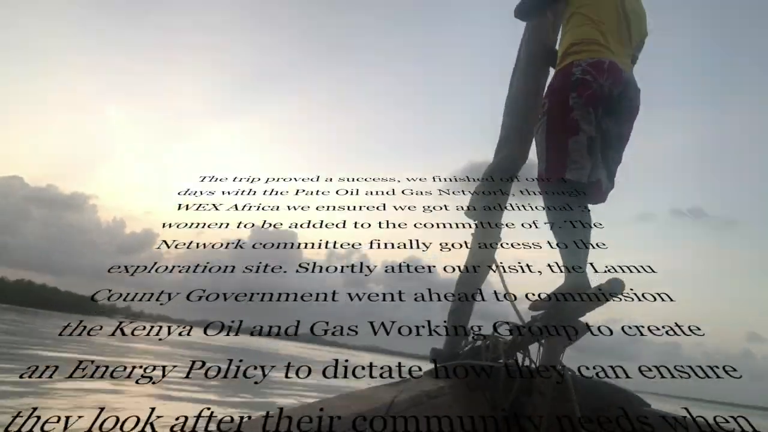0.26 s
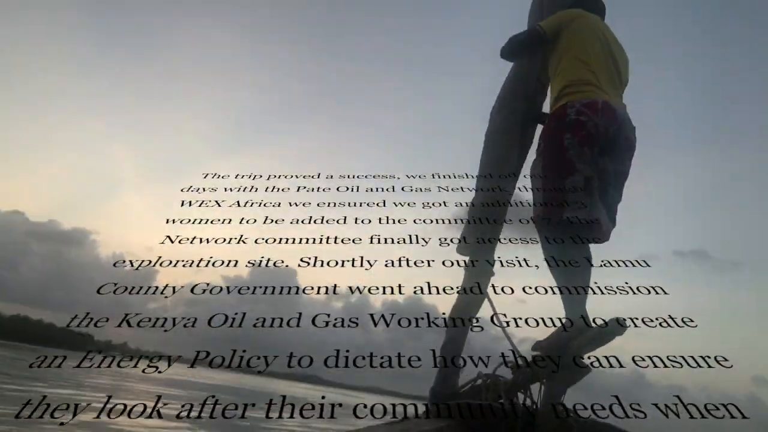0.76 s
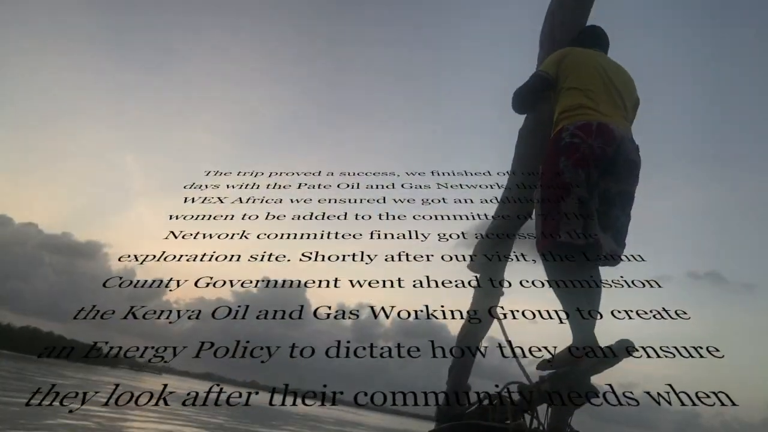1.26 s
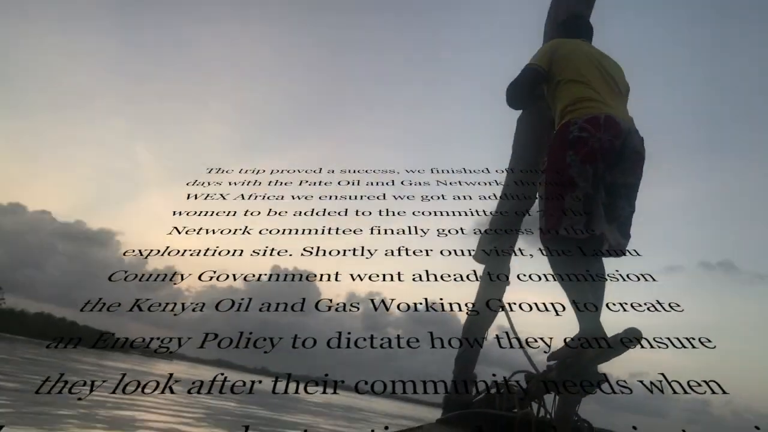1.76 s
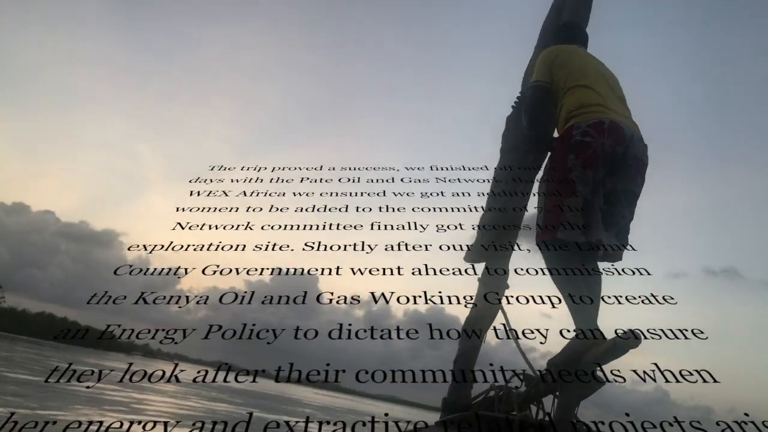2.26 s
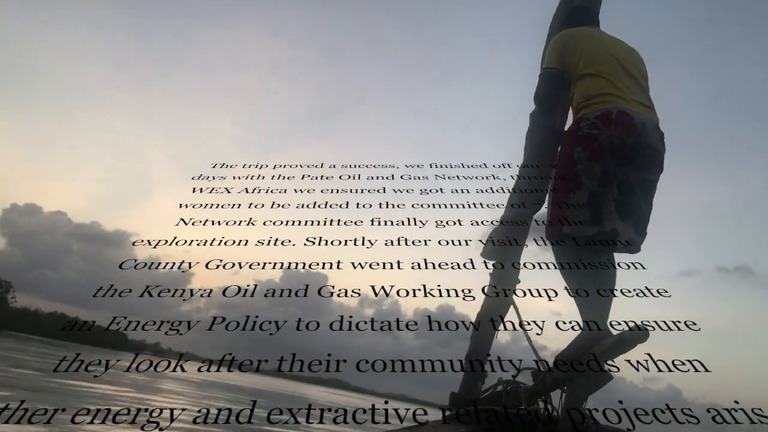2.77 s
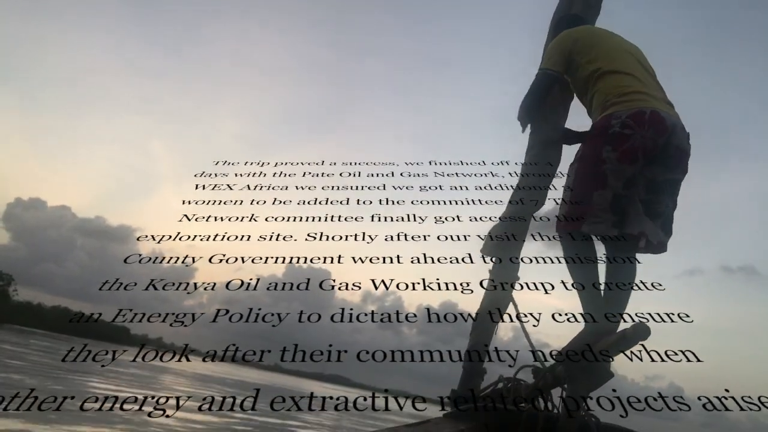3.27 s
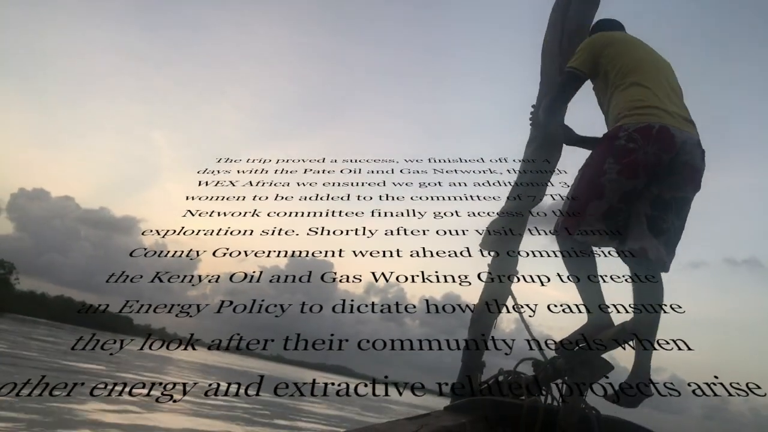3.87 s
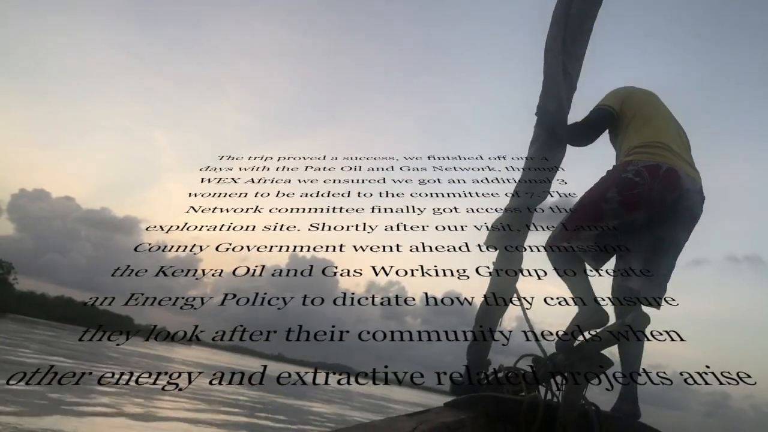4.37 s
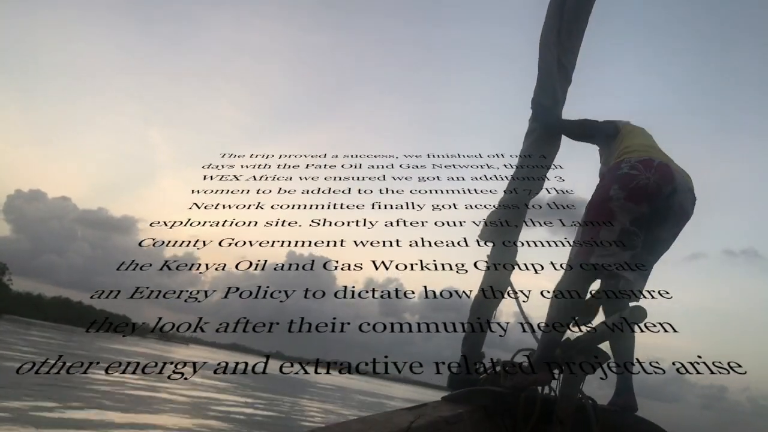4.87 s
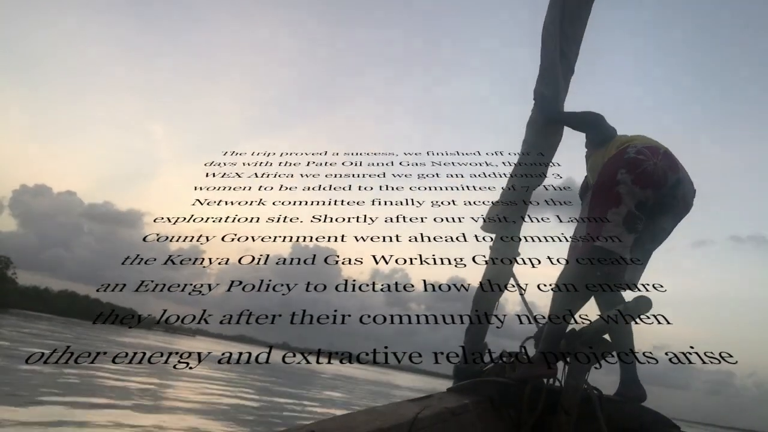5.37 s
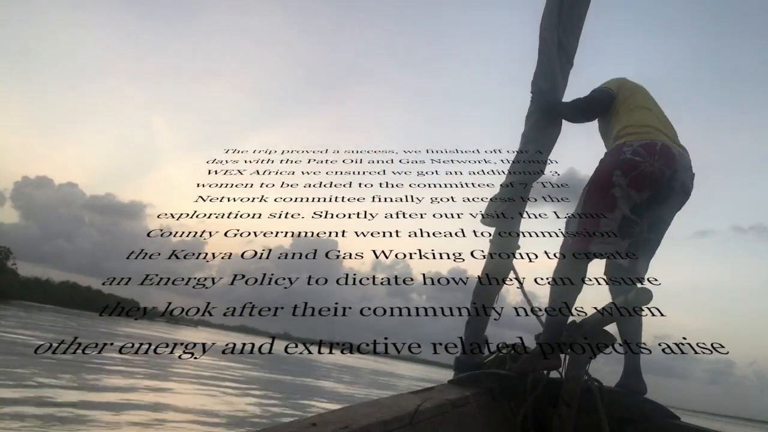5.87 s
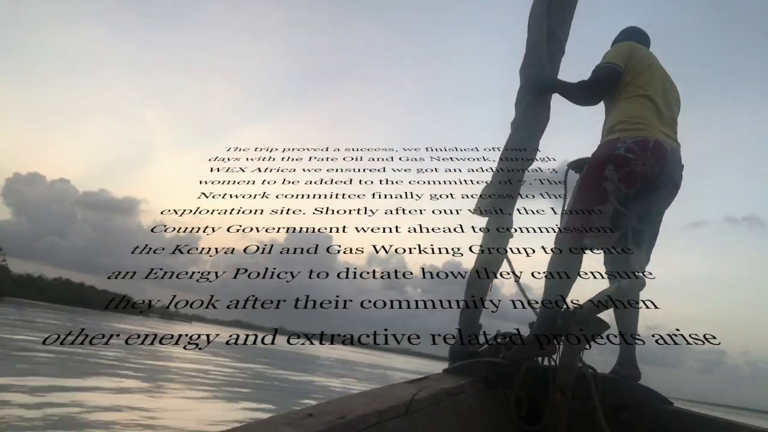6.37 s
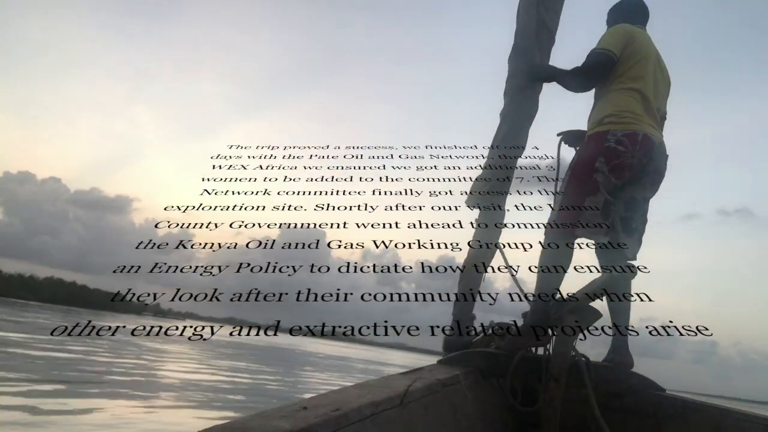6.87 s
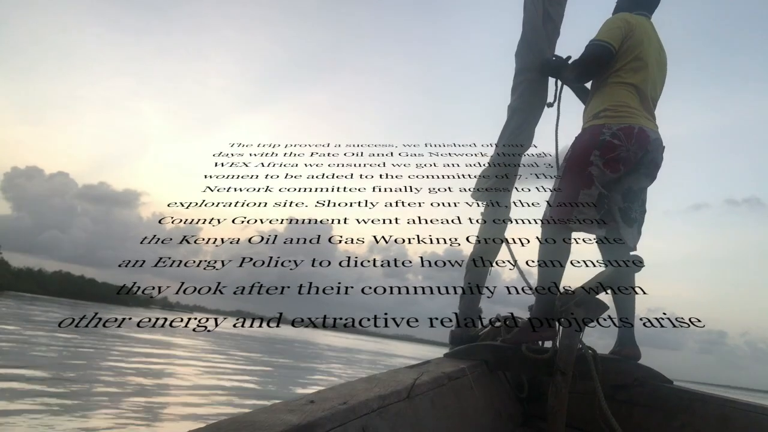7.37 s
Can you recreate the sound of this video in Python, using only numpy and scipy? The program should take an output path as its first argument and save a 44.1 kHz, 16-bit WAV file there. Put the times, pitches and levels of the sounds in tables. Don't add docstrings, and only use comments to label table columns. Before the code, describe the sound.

Outdoors on a small wooden sailing boat, a hand-held microphone picks up low wind rumble, quiet water and steady faint hiss. The first two seconds are busy with scratchy cloth and rope rubs and muffled knocks. Then come footfall-like raps with scuffs and very sharp dry clicks, leading to a deep hull thump just after four seconds. The rest is calm, with tiny creaks and sparse taps, then a short rattle of knocks near the end.

```python
import sys
import numpy as np
from scipy import signal
from scipy.fft import rfft, irfft, next_fast_len
from scipy.io import wavfile
from scipy.ndimage import uniform_filter1d

SR = 44100
rng = np.random.default_rng(int(sys.argv[2]) if len(sys.argv) > 2 else 0)


def materialize(psi):
    bounded = np.clip(np.atleast_2d(psi).T, -1, 1)
    quanta = np.round(bounded * 32767).astype(np.int16)
    wavfile.write(sys.argv[1], SR, quanta)


def magnitude_from_level(level_db):
    exponent = np.asarray(level_db, float) / 20
    return 10 ** exponent


N = 335995

# [f/Hz, level/dB]
RUMBLE_COLOUR = [(12, -50), (20, -7.5), (64, -3), (110, -9.5), (129, -8), (183, -12.5), (252, -18),
                 (320, -23), (357, -21), (381, -30.5), (900, -22), (1170, -67), (1980, -120)]
# [f/Hz, level/dB]
WATER_COLOUR = [(180, -40), (300, -8), (355, -3), (386, -4.5), (607, -12), (682, -14), (793, -16.5),
                (923, -16), (1250, -16), (4770, -26), (15200, -32.5), (16500, -57)]
# [f/Hz, level/dB]
FIBRE_COLOUR = [(530, -38), (900, -11), (1260, 0.5), (1400, -3), (2050, 3), (3070, -4.5), (3670, 3),
                (4330, -1.5), (5310, -0.5), (7230, 2), (15500, -4)]
# [f/Hz, level/dB]
MIC_COLOUR = [(20, -1), (6500, -0.5), (7600, -2.5), (8500, 0.5), (9600, 0.5), (10400, -3), (11500, 2.5)]
# [t/s, level/dB]
GUSTS = [(0, -39), (.15, -43.5), (.85, -44), (.98, -49.5), (1.29, -42), (1.46, -44), (1.74, -48.5),
         (1.82, -45.5), (2.82, -40), (3.12, -46.5), (3.42, -46), (3.75, -39), (3.84, -48.5), (4.11, -38),
         (4.6, -46.5), (6.6, -44), (6.97, -48.5), (7.3, -43.5)]
# [t/s, level/dB]
BUSTLE = [(0, -49), (.1, -58), (.4, -50.5), (.85, -53.5), (1.04, -55.5), (1.4, -50.5), (1.84, -55.5),
          (2.23, -59.5), (2.46, -57), (2.58, -57.5), (3.4, -61.5), (3.48, -51), (3.75, -62.5), (4.3, -57.5),
          (4.9, -64.5), (6.6, -61.5), (7.0, -62.5), (7.62, -65)]
# [t/s, peak level/dB, treble level/dB, fade by 60 dB/s]
RUBS = [(.072, -42, -3.5, 0.13), (.14, -45.5, -13, 0.61), (0.34, -38.5, -19, .12), (.375, -44.5, -9, .17),
        (0.45, -29, -8, .18), (.5629, -38, -13, 0.044), (.627, -42, -1.5, 0.083), (.7243, -54, -2, .12),
        (.92, -56, 4, .12), (1.034, -47.5, -4, 0.1), (1.069, -36, -26, 0.17), (1.094, -40, -6, 0.22),
        (1.12, -27.5, -10.5, 0.32), (1.2094, -55, -18, .12), (1.279, -39, -17, .12),
        (1.348, -42.5, -8, 0.16), (1.433, -42, -13, 0.14), (1.628, -42.5, -4.5, 0.12),
        (1.783, -47, -11, 0.2), (1.9, -42, -8, .064)]
# [t/s, peak level/dB, treble level/dB]
SCUFFS = [(2.104, -35, -24), (2.495, -41, -23), (2.592, -41.5, -29), (2.793, -36.5, -18),
          (2.8458, -31.5, -19), (3.461, -36, -13), (3.523, -37.5, -26), (3.926, -50.5, -5.5),
          (4.106, -34, -27), (4.174, -41.5, -8), (4.229, -46, -28), (4.4794, -47, -11), (7.319, -41, -14),
          (7.352, -51, -15), (7.567, -47, -1.5), (7.577, -45, -14), (7.586, -50, 2)]
# [t/s, level/dB, f/Hz, length/s, glide as end over start pitch]
CREAKS = [(0.933, -73, 3650, 0.11, 1.01), (4.412, -67, 1250, 0.041, 1.08), (4.385, -72, 2600, 0.049, .96),
          (4.452, -71, 2050, 0.03, 1.01), (4.475, -72, 2300, .025, 1.01), (5.006, -63.5, 1290, 0.013, 0.99),
          (6.683, -74, 2900, 0.018, 1.01), (6.76, -68.5, 1030, 0.017, 1.01), (.24, -64, 1300, .018, 1.45),
          (.272, -67, 1400, .08, .9), (.27, -73, 2250, .06, .9)]
# [t/s, peak level/dB, f/Hz, fade by 60 dB/s]
BOOMS = [(.003, -32.5, 172, 0.28), (.572, -39, 195, .12), (0.797, -33, 39.9, 0.3),
         (1.089, -37.5, 162, 0.19), (1.296, -27, 178.3, 0.28), (1.44, -30.5, 37, .25),
         (2.121, -38, 117, 0.096), (2.505, -24, 175.4, 0.26), (2.809, -34.5, 152, 0.1),
         (3.925, -30.5, 100.3, 0.3), (4.121, -16.5, 50.3, 0.13), (4.12, -28.5, 119.3, 0.21),
         (4.227, -28.5, 48, 0.15), (7.345, -50, 161, 0.16), (1.34, -37, 145, .2), (3.532, -39.5, 139, 0.18),
         (3.721, -39, 59.7, 0.11), (4.661, -33, 69, 0.097)]
# [t/s, peak level/dB, plank f/Hz, bright part level/dB]
THUDS = [(.004, -42, 506, -10.5), (0.196, -42, 402, -28), (.213, -46, 417, -18), (0.558, -35, 420, -40),
         (0.578, -56, 383, -26), (.695, -37.5, 275, -18), (.716, -42, 500, -28), (0.869, -32.5, 600, -24),
         (.884, -41, 370, -30), (1.091, -39, 408, -25), (2.305, -44.5, 580, -22),
         (2.772, -39.5, 256, -10.5), (3.923, -37.5, 272, -18), (4.108, -26.5, 302, -16),
         (4.122, -28, 400, -22), (4.256, -40, 660, -14), (5.413, -47.5, 448, -22), (6.171, -44, 370, -19),
         (7.337, -36.5, 500, -18), (7.393, -45.5, 360, -29), (.193, -46, 740, -26), (.213, -52, 690, -26)]
# [t/s, peak level/dB, plank f/Hz, bright part level/dB, bright f/Hz]
RAPS = [(1.13, -35, 420, -14, 1150), (1.209, -40.5, 477, -10.5, 1460), (1.257, -42, 800, 1.5, 1496),
        (1.287, -39, 600, -2, 1000), (1.293, -35, 420, -6.5, 1900), (1.639, -48.5, 630, 7, 1640),
        (2.102, -39, 412, 2.5, 1217), (2.493, -34, 476, -5.5, 1194), (2.596, -50.5, 423, -5, 1210),
        (2.798, -40.5, 315, -3.5, 1385), (2.829, -45.5, 415, -4.5, 938), (3.454, -54, 400, 9, 1450),
        (3.505, -46.5, 398, 2.1, 1390), (3.529, -45, 368, 0, 1290), (3.609, -54, 248, -4, 1790),
        (3.67, -46.5, 266, -7.5, 960), (3.739, -50.5, 290, -4, 985), (3.912, -38, 610, -5.5, 1150),
        (4.01, -45.5, 243, -8.5, 974), (4.174, -41, 378, -9, 1470), (4.223, -43, 245, -10, 1170),
        (7.3215, -37, 702, 2, 1250)]
# [t/s, peak level/dB, f/Hz, width/Hz]
PINGS = [(.9047, -43, 11500, 2500), (.9049, -46, 14500, 2000), (.9128, -33, 12000, 1800),
         (.913, -35, 14000, 1800), (.9132, -43, 9300, 1200), (2.8495, -35, 15200, 2200),
         (2.8497, -40, 9200, 1200), (2.8502, -37, 3800, 500), (7.5686, -44, 14000, 900),
         (7.5688, -45, 7000, 500), (7.5684, -39, 3800, 700), (.4553, -36, 3900, 600),
         (.6282, -42, 3750, 600), (.7765, -38, 1300, 500), (.8122, -36, 1650, 700),
         (2.3291, -33, 8600, 800), (2.3254, -33, 9000, 900), (3.4272, -36, 13500, 1500),
         (2.6628, -30, 3600, 500), (.7795, -36, 5800, 900), (6.5591, -47, 3500, 500),
         (.868, -48, 1250, 200), (7.3205, -33, 950, 160), (7.374, -50, 1200, 200), (1.2675, -40, 1400, 250),
         (1.273, -44, 1950, 300)]
# [t/s, peak level/dB, f/Hz]
CHATTER = [(6.5588, -43, 2880), (6.5636, -48, 2450), (6.5676, -51, 2600), (6.5771, -52, 3300),
           (4.4448, -50, 3700), (2.2364, -50.5, 2800), (1.6297, -39.5, 1870), (7.5685, -48, 2120),
           (7.356, -52, 4900), (7.323, -53, 4500), (4.0868, -27.5, 2180), (2.675, -43, 2700),
           (2.689, -48, 4000), (2.3205, -46, 2300), (2.3822, -36, 2450), (2.3853, -46, 5600),
           (.203, -52, 3700), (.344, -52, 2700), (.413, -47, 1750), (3.4578, -40, 3050),
           (3.4633, -46, 4500), (3.4635, -41, 2100), (3.513, -45, 3300), (3.5255, -43.5, 4000),
           (3.532, -45, 3440), (3.535, -40, 1330), (3.6419, -48, 2100), (3.6683, -48, 1600),
           (4.094, -45, 2900), (4.1093, -42.5, 3700), (4.118, -41, 2500), (4.16, -49, 4250),
           (4.1786, -45, 1800), (4.1841, -47, 3600), (4.222, -48, 1880), (4.2315, -50.5, 4000),
           (4.243, -52, 3600), (3.9285, -52, 2600)]
# [t/s, peak level/dB, middle modes level/dB, top modes level/dB, struck f/Hz]
SNAPS = [(0.4553, -34, -10, -20, 3750), (.757, -40.5, -12, -4, 2000), (0.776, -24.5, 4, -10.5, 3830),
         (0.7785, -35, -20, -20, 1880), (.812, -23, -12, -4.5, 2850), (2.3252, -22, -5, -3.5, 2560),
         (2.329, -22.5, -6, -8, 2580), (2.3327, -38, -3, -5, 3370), (2.346, -30.5, 0, -21, 2750),
         (2.3813, -21.5, -17, -23, 2440), (2.6592, -10.5, -29, -37, 2330), (2.8497, -39, -17, -18, 3030),
         (3.4271, -13.5, -5.5, -27, 2690), (3.4322, -25, -17, -18, 2750), (3.436, -26, -7.5, -17, 2870),
         (4.0866, -31.5, -1, -13, 2160), (7.5684, -40, -7, -14, 3830), (4.84, -61, 8, 4, 2060)]
# [t/s, peak level/dB, top modes
# level/dB, struck f/Hz]
MORE_TICKS = [
    (.0742, -43, -8, 2010),
    (0.6284, -36, -14, 3850),
    (1.0194, -59, -3, 3680),
    (1.413, -40, -15, 3630),
    (1.642, -42, -20, 1650),
    (6.0094, -55, -2, 2010),
]
# [f/Hz, width/Hz, level/dB]
SHELL_MODES = [(1750, 300, -9.5), (2250, 274, -3), (3454, 300, -0.5), (4280, 300, -2.5), (5200, 580, 2.5),
               (6235, 470, -2), (8020, 600, -3), (9300, 1000, -6), (11800, 1200, 3.5), (14000, 2000, 0.4)]


def noise(n=N):
    return rng.standard_normal(n)


def level(x, db):
    return x * magnitude_from_level(db) / np.sqrt(np.mean(x ** 2))


def colour(x, points):
    hz, db = np.transpose(points)
    n = next_fast_len(len(x))
    f = np.arange(n // 2 + 1) * SR / n + 1
    gain = magnitude_from_level(np.interp(np.log(f), np.log(hz), db))
    return irfft(rfft(x, n) * gain, n)[:len(x)]


def band(x, lo_hz, hi_hz, order=2):
    return signal.sosfilt(signal.butter(order, [lo_hz, hi_hz], "band", fs=SR, output="sos"), x)


def walk(rate):
    k = int(SR / rate)
    held = np.repeat(noise(N // k + 1), k)
    return 1.14 * uniform_filter1d(uniform_filter1d(held, k), k)[:N]


def grit(n, scatter_db, size=64):
    grains = magnitude_from_level(scatter_db * noise(n // size + 1))
    return noise(n) * np.repeat(grains, size)[:n]


def seconds(n):
    return np.arange(n) / SR


def mode_width(t60):
    return np.log(1000) / np.pi / t60


def ring(modes, t, turn, lag=0, wave=np.sin):
    hz, width, db = np.transpose(modes)[:, :, None]
    hz = hz * (1 + 0.013 * turn[:len(modes), None])
    swings = wave(2 * np.pi * hz * (t - lag))
    return np.sum(magnitude_from_level(db) * np.exp(-np.pi * width * t) * swings, axis=0)


def burst(t, t60, hold, rise):
    fade = np.exp(-np.log(1000) * np.maximum(t - abs(hold), 0) / max(t60, .005))
    return (1 - np.exp(-t / rise)) * fade


def add(out, s, sound, peak_db):
    i = max(int(s * SR), 0)
    out[i:i + len(sound)] += (sound * magnitude_from_level(peak_db) / np.abs(sound).max())[:N - i]


def hiss():
    return level(band(colour(noise(), WATER_COLOUR), 1130, 20000), -64.5)


def breeze(deep_db, drone_db, lap_db):
    low, mid, hum = (colour(noise(), RUMBLE_COLOUR) for _ in range(3))
    gust_top_db, drone_top_db = -37, -43
    deep = level(band(low, 27.4, 92.4), 0)
    deep = deep * magnitude_from_level(np.minimum(deep_db, gust_top_db) + 0.33 * walk(13.0))
    drone = level(band(mid, 109.3, 355), 0)
    drone = drone * magnitude_from_level(np.minimum(drone_db, drone_top_db) - 1.5 + walk(13))
    lap = level(band(colour(grit(N, 2.3), WATER_COLOUR), 358, 2080), 0)
    lap = lap * magnitude_from_level(lap_db + 1.4 * walk(20))
    stay_hz, stay_width_hz = 355.7, 15
    stay = band(hum, stay_hz - stay_width_hz / 2, stay_hz + stay_width_hz / 2, order=1)
    stay = level(stay, -67.5) * magnitude_from_level(3.5 * walk(2.62))
    return deep + drone + lap + stay


def rubs():
    cloth = [(*r, 0.041 * r[3]) for r in RUBS]
    feet = [(*r, 0.09, 0.0018) for r in SCUFFS]
    return cloth + feet


def rigging(rustle_db):
    low = level(band(colour(grit(N, 2.2), FIBRE_COLOUR), 800, 4620), 0)
    high = level(band(colour(grit(N, 2.0), FIBRE_COLOUR), 4800, 21600), 0)
    t, low_gain, high_gain = seconds(SR // 3), np.zeros(N), np.zeros(N)
    lag_s = .0025
    for s, db, treble_db, t60, hold in rubs():
        add(low_gain, s + lag_s, burst(t, t60, hold, 0.00016), db - 13.0)
        add(high_gain, s + lag_s, burst(t, 0.94 * t60, hold, 0.00022), db + treble_db - 5)
    swish_s, swish_length_s, swish_db = 6.9, 0.28, -68
    add(high_gain, swish_s, np.hanning(int(swish_length_s * SR)), swish_db)
    steady = magnitude_from_level(rustle_db - 8 + 2.1 * walk(40))
    return low * np.hypot(low_gain, steady) + high * np.hypot(high_gain, steady * magnitude_from_level(-3.5))


def creaks():
    out = np.zeros(N)
    for s, db, hz, length, glide in CREAKS:
        n = int(length * SR)
        wobble = uniform_filter1d(noise(SR // 2), size=90)[:n]
        pitch = hz * np.linspace(1, glide, n) * (1 + 0.43 * wobble)
        tone = np.sin(2 * np.pi * np.cumsum(pitch) / SR)
        add(out, s, np.hanning(n) ** .5 * tone, db + 11.0)
    return out


def hull():
    out, t = np.zeros(N), seconds(SR // 2)
    for s, db, hz, t60 in BOOMS:
        width = mode_width(max(t60, .02))
        boom = ring([(hz, width, 0), (0.565 * hz, width, -6)], t, np.zeros(2))
        add(out, s, boom * (1 - np.exp(-t * hz / 0.48)), db)
    return out


def knocks():
    thud_bright_hz, thud_cycles, thud_longest_s = 1350, 35, 0.086
    contact_t60_s, rap_cycles = 0.059, 24.6
    thuds = [(*r, thud_bright_hz, min(thud_cycles / r[2], thud_longest_s)) for r in THUDS]
    raps = [(*r, contact_t60_s + rap_cycles / r[2]) for r in RAPS]
    return thuds + raps


def shaken():
    out, t = np.zeros(N), seconds(SR)
    shake_t60_s = 0.52
    for s, db, *_ in knocks():
        add(out, s, burst(t, shake_t60_s / 2, .01, 0.0085), 2 * db)
    return out


def planks():
    out, t = np.zeros(N), seconds(SR // 5)
    for s, db, hz, bright_db, bright_hz, t60 in knocks():
        turn = noise(4)
        width = mode_width(max(t60, .01))
        shake = grit(len(t), 2.3)
        body = ring([(hz, width, 0), (1.7 * hz, 0.94 * width, -13), (0.741 * hz, width, -8)], t, turn)
        scrape = level(band(shake, 271, 502), 0) * burst(t, 2.15 * t60, 0.004, 0.005)
        body = body + 0.36 * scrape
        add(out, s, body * (1 - np.exp(-t / 0.00054)), db)
        edge = ring([(bright_hz, 2 * width, 0), (1.1 * bright_hz, 2.3 * width, -7),
                     (0.69 * bright_hz, 2 * width, -9)], t, turn)
        scrape = level(band(shake, 660, min(1.54 * bright_hz, 2100), order=5), 0)
        edge = edge + 0.5 * scrape * burst(t, 0.88 * t60, 0.007, 0.00056)
        add(out, s, edge * (1 - np.exp(-t / 0.00047)), db + bright_db + 7.5)
    return out


def pings():
    out, t = np.zeros(N), seconds(SR // 20)
    for s, db, hz, width in PINGS:
        ping = ring([(hz, width, 0)], t, np.zeros(1))
        add(out, s, ping * (1 - np.exp(-t * width / .3)), db)
    return out


def chatter():
    out, t = np.zeros(N), seconds(SR // 10)
    width_hz, rattle_share, rattle_t60_s = 225, 0.18, 0.073
    full_db = -39
    for s, db, hz in CHATTER:
        rattle = level(band(grit(len(t), 2.7), 0.77 * hz, 1.14 * hz), 0)
        rattle = rattle * burst(t, rattle_t60_s, 0.0018, 0.0034) * magnitude_from_level(min(0, full_db - db))
        tone = ring([(hz, width_hz, 0)], t, np.zeros(1)) * (1 - np.exp(-t / 0.00078))
        add(out, s, tone + rattle_share * rattle, db)
    return out


def ticks():
    snaps = [(s, db, mid, top, -22.5 - 0.3857 * (db + 43), hz) for s, db, mid, top, hz in SNAPS]
    faint = [(s, db, -8, top, -32, hz) for s, db, top, hz in MORE_TICKS]
    return snaps + faint


def casing():
    out, t = np.zeros(N), seconds(SR // 5)
    contact_s = .0005
    echo_s, echo_db = .0037, -17
    onset = 1 - np.exp(-(t / 0.00044) ** 2)
    for s, db, mid_db, top_db, rattle_db, hz in ticks():
        turn = noise(11)
        modes = [(hz, 380, 3)] + SHELL_MODES
        tick = np.zeros(len(t))
        for a, b, gain_db in ((0, 5, 0), (5, 7, mid_db + 5.0), (7, 11, top_db + 8.5)):
            part = ring(modes[a:b], t, turn[a:], contact_s, np.cos) * onset
            tick += magnitude_from_level(gain_db) * part / np.abs(part).max()
        tick = tick + magnitude_from_level(echo_db) * np.roll(tick, int(echo_s * SR))
        shake = grit(len(t), 3.5)
        rattle = level(band(shake, 2070, 3830, order=3), 0)
        rattle = rattle + magnitude_from_level(mid_db + 7.5) * level(band(shake, 3800, 9200), 0)
        rattle = magnitude_from_level(rattle_db) * rattle * burst(t, 0.13, 0.0008, 0.001)
        sound = band(tick + rattle, 1750, 22000)
        add(out, s, sound, db + 3.2 + max(0, mid_db + 7, top_db + 9.5))
    return out


def stirred(db, by_db, shake):
    return 10 * np.log10(magnitude_from_level(2 * db) + magnitude_from_level(2 * by_db) * shake)


def scene():
    t = seconds(N)
    gust_db = np.interp(t, *np.transpose(GUSTS))
    bustle_db = np.interp(t, *np.transpose(BUSTLE))
    gusty, busy = gust_db + 45, bustle_db + 62
    shake = shaken()
    drone_db = stirred(-49.5 + 0.29 * gusty + 0.051 * busy, -10, shake)
    lap_db = stirred(-61.5 + 0.33 * gusty + 0.25 * busy, -25.5, shake)
    ground = hiss() + breeze(gust_db, drone_db, lap_db) + rigging(bustle_db)
    boat = creaks() + hull() + planks() + pings() + chatter() + casing()
    return (ground + boat)[None]


def top_cut(x):
    return signal.sosfilt(signal.butter(12, 15850, fs=SR, output="sos"), x)


def record(dry):
    mix = colour(dry[0], MIC_COLOUR)[None]
    return top_cut(mix)


dry = scene()
out = record(dry)
materialize(out)
```